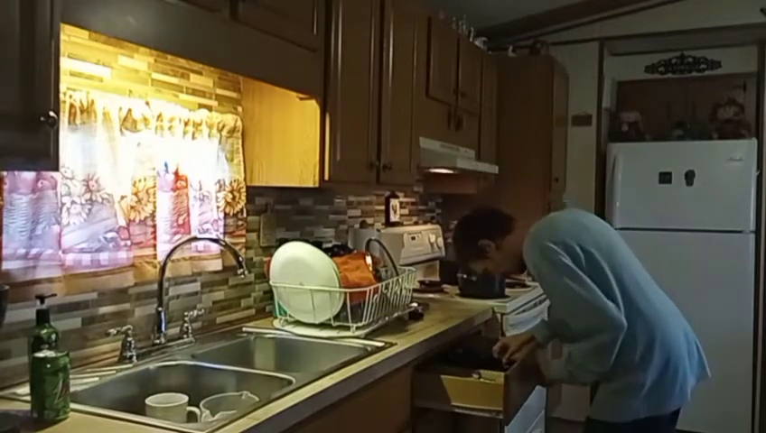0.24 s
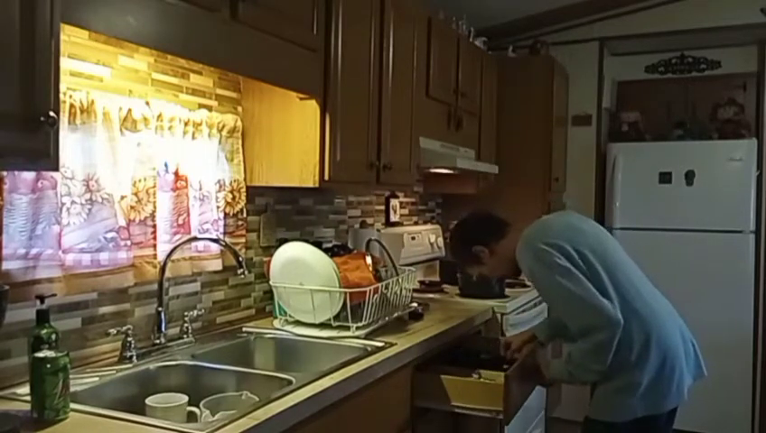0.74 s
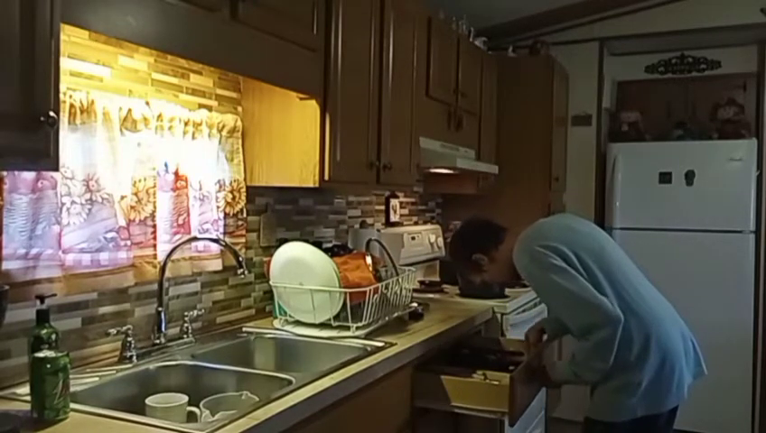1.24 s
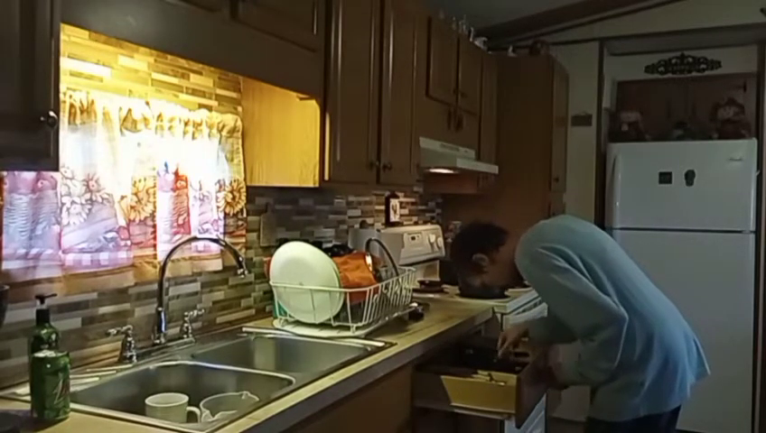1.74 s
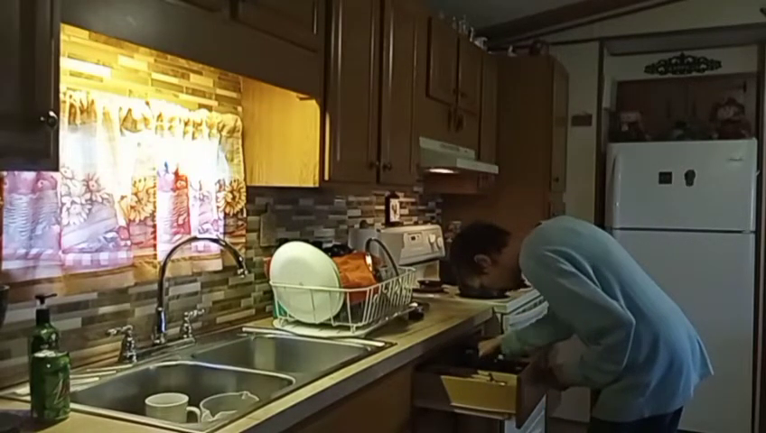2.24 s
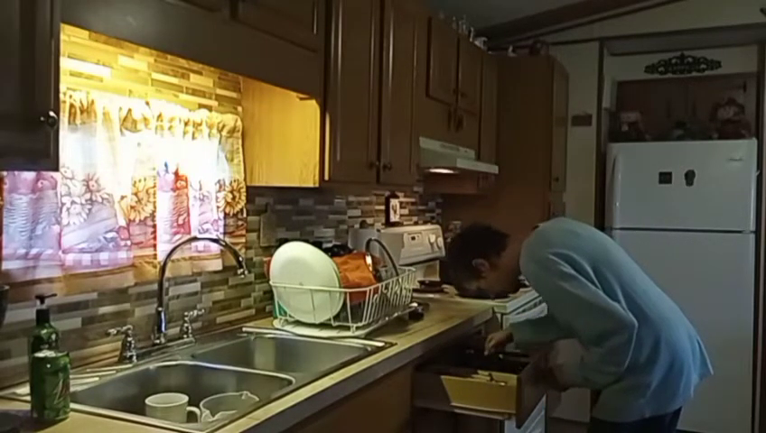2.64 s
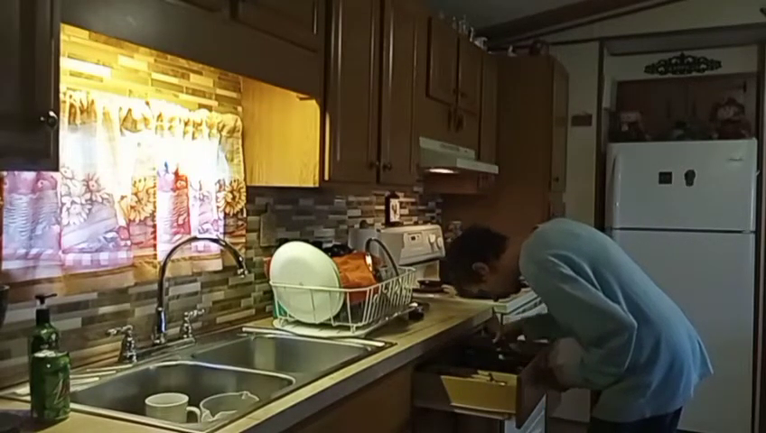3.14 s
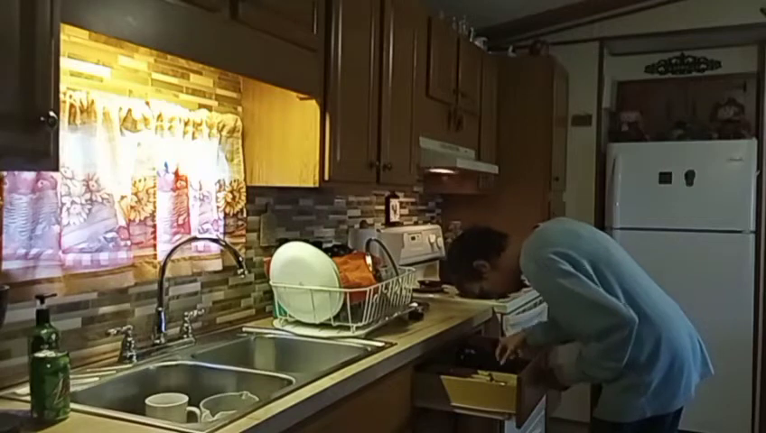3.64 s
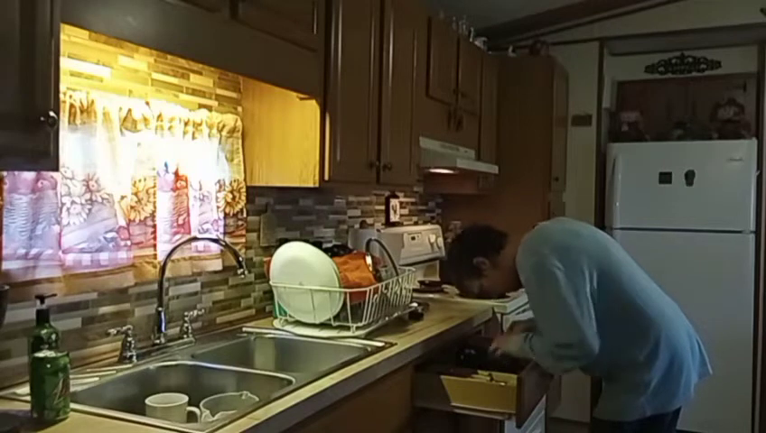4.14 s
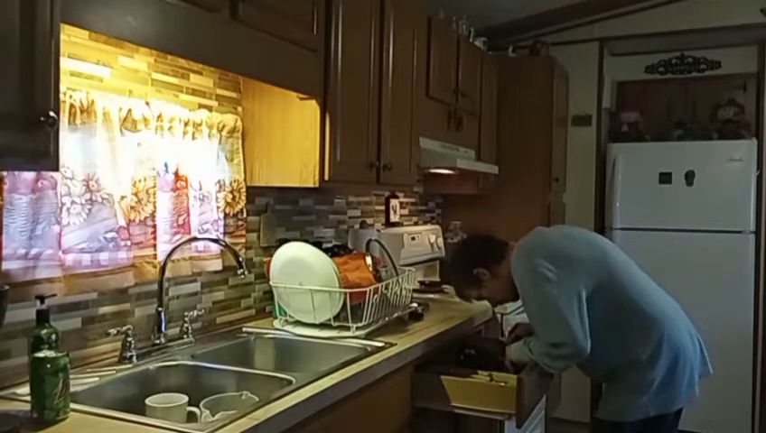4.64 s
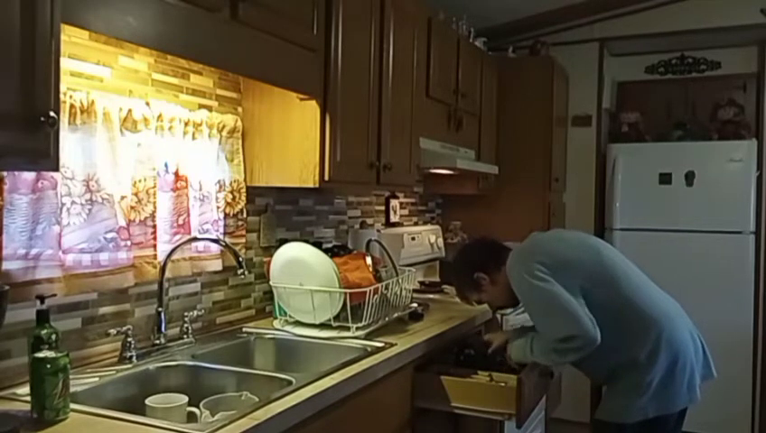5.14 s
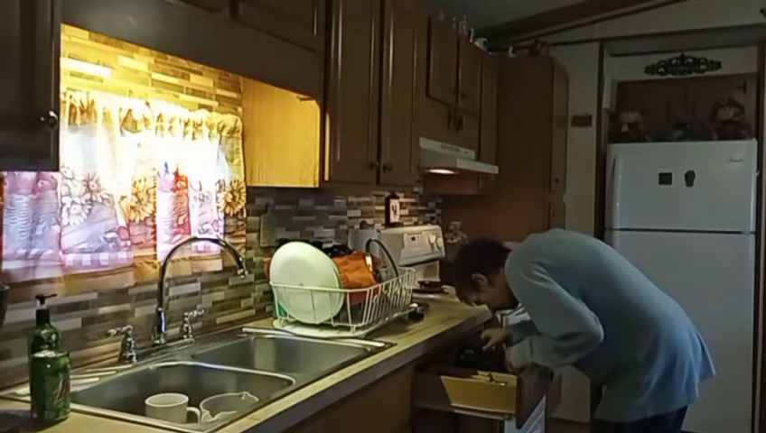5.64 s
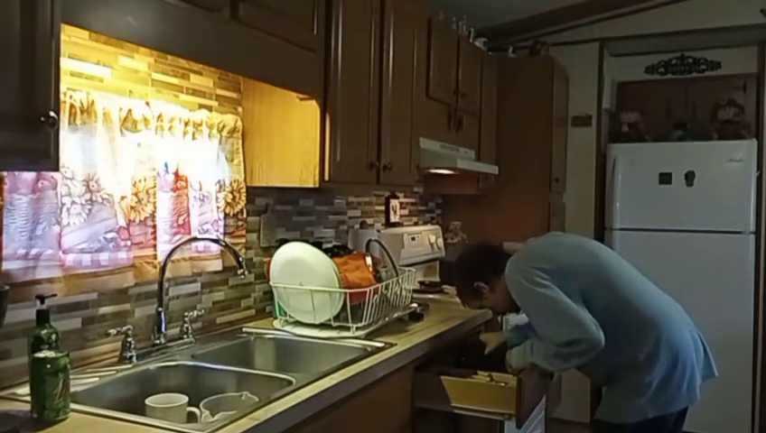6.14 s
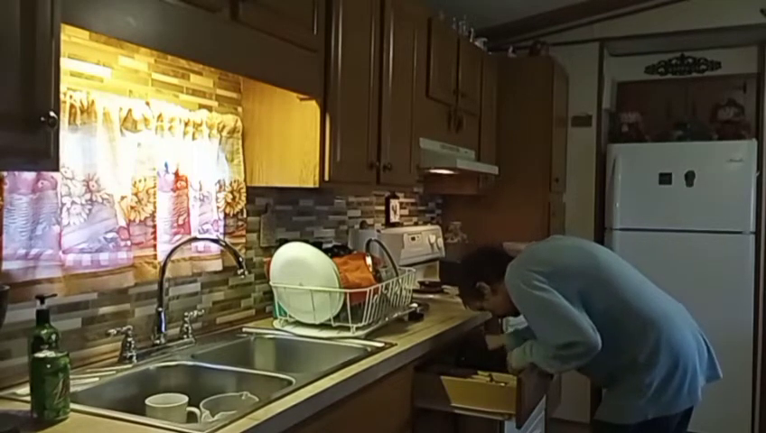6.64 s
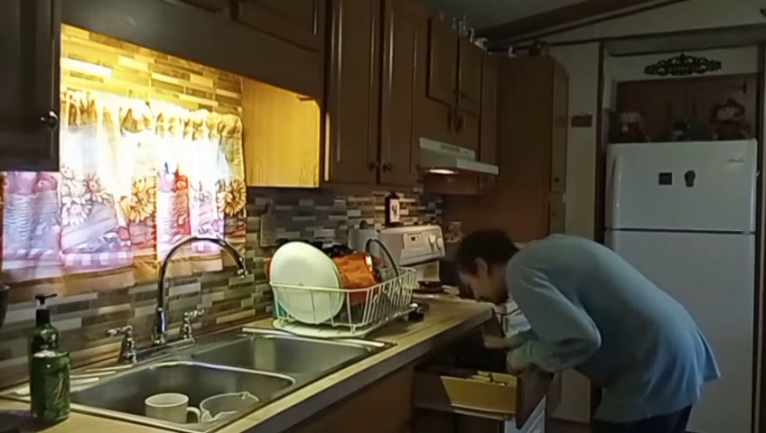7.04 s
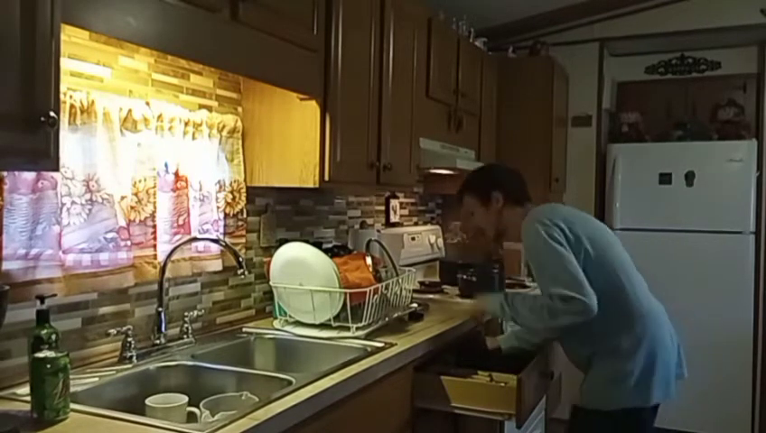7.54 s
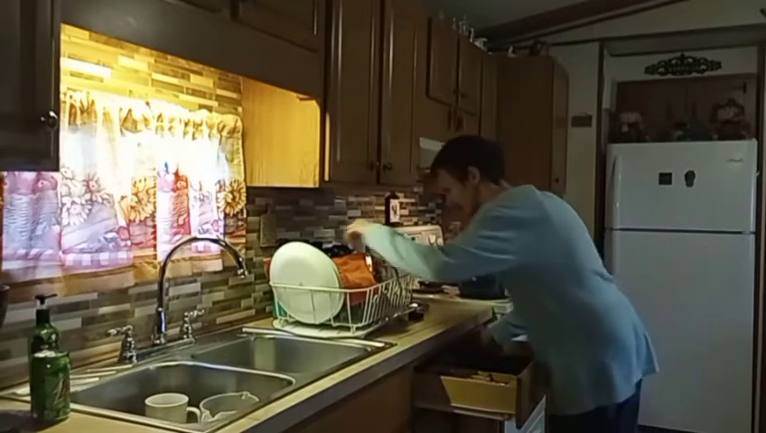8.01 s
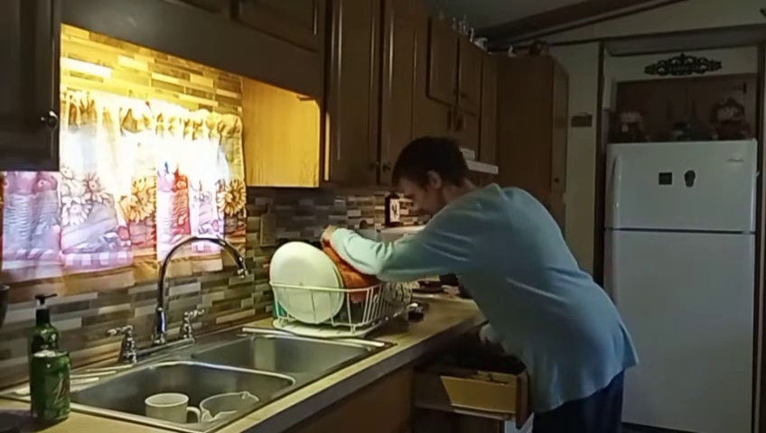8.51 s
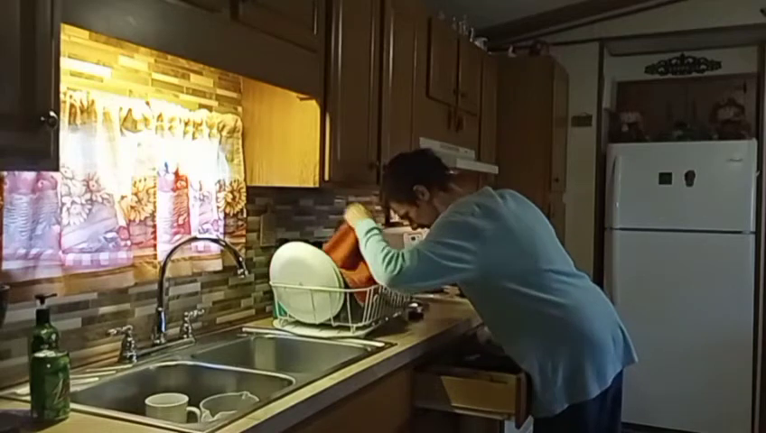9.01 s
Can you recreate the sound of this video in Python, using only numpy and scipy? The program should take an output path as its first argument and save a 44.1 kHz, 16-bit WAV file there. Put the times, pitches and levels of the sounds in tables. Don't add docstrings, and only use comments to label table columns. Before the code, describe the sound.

A small, hard kitchen heard in stereo from about three metres, with echoes stronger than the direct sound and a faint low refrigerator hum and hiss throughout. From 0 to 2 seconds a hand lightly stirs cutlery: soft shuffles, small clinks, wooden taps and tiny squeaks near 1 second. From 2 to 4 seconds the knocks grow firmer, with faint hollow ladle taps around 3 and a sharp clink at 3.4. The busiest rummaging follows, with a bright, hard steel clash at 5.0 and dense clatter from 5.6 to 6.2, over drawer knocks and dull floor thuds. It thins from 6.3, with a brief squeak at 6.6 and scattered light clinks until 8. At 8.4 a dish is nudged, striking loudly at 8.6 and chattering on rack wires. Small knocks near 8.95 precede a ringing pot clang at 9.2.

```python
import sys
import numpy as np
from scipy import signal
from scipy.fft import rfft, irfft
from scipy.io import wavfile
from scipy.ndimage import uniform_filter1d

SR = 44100
rng = np.random.default_rng(int(sys.argv[2]) if len(sys.argv) > 2 else 0)


def inscribe(sig):
    pcm = np.round(np.clip(np.atleast_2d(sig).T, -1, 1) * 32767)
    wavfile.write(sys.argv[1], SR, pcm.astype(np.int16))


def voltage_ratio(level):
    return 10 ** (np.asarray(level, float) / 20)


N = 408807
T = np.arange(N) / SR
BINS = np.maximum(np.fft.rfftfreq(4096, 1 / SR), 1)


def on_log(table, hz):
    f, v = np.transpose(table)
    return np.interp(np.log(hz), np.log(f), v)


def unit(gain):
    return gain(BINS) / np.sqrt(np.mean(gain(BINS) ** 2))


def response(gain):
    cepstrum = irfft(np.log(gain + 1e-5))
    cepstrum[1:2048] = 2 * cepstrum[1:2048]
    cepstrum[2049:] = 0
    return irfft(np.exp(rfft(cepstrum)))


def colour(x, gain):
    return signal.oaconvolve(x, response(unit(gain)))[:N]


def slopes(table, fall_db=24):
    lo, hi = table[0][0], table[-1][0]

    def gain(f):
        octaves_outside = np.abs(np.log2(f / np.clip(f, lo, hi)))
        return voltage_ratio(on_log(table, f) - fall_db * octaves_outside)
    return gain


def ring(hz, t60, size=8192):
    t = np.arange(size) / SR
    z = np.sin(2 * np.pi * hz * t) * 1000. ** (-t / t60)
    return z / np.sqrt(np.sum(z ** 2))


def rattle(ms, chance):
    fade = np.exp(-np.arange(len(chance)) * 1000 / SR / max(ms, .5))
    z = np.r_[3., chance[1:]] ** 3 * fade
    return z / np.sqrt(np.sum(z ** 2))


def add(track, s, x):
    i = int((s - .001) * SR)
    track[i:i + len(x)] += x[:N - i]


# f/Hz, left-right correlation [-]
LIKENESS = [(30, 0.8), (100, 0.88), (200, 0.97), (500, 0.6), (1000, 0.06), (4000, 0.12), (12000, 0.1)]


def pair(size):
    c = np.clip(on_log(LIKENESS, np.maximum(np.fft.rfftfreq(size, 1 / SR), 1)), 0, 1)
    mid, side = rfft(rng.standard_normal((2, size)))
    return irfft(mid * np.sqrt((1 + c) / 2) + side * np.sqrt((1 - c) / 2) * np.array([[1], [-1]]), size)


# f/Hz, level/dB
COMPRESSOR_LINES = [(193.8, -70.5), (387.6, -79.5), (608.3, -100.5), (651.4, -81.5)]
# f/Hz, density/dB per Hz
HISS = [(15, -65), (25, -32), (43, -22.5), (141, -17), (195, -10), (249, -17), (659, -15.5), (936, -23),
        (4610, -34.5), (6380, -35.5), (8360, -46.5), (14800, -43), (16000, -55.5)]


def fridge(waver_db=1.5, hiss_db=-67):
    slow = rng.standard_normal((len(COMPRESSOR_LINES), N))
    slow = uniform_filter1d(uniform_filter1d(slow, 3000), 3000)
    slow = slow / slow.std()
    hum = np.zeros(N)
    for (hz, db), w in zip(COMPRESSOR_LINES, slow):
        hum += np.sqrt(2) * voltage_ratio(db + waver_db * w) * np.sin(2 * np.pi * hz * T + .5 * w)
    f = np.maximum(np.fft.rfftfreq(N, 1 / SR), 1)
    hiss = irfft(rfft(pair(size=N)) * voltage_ratio(on_log(HISS, f)), N)
    return hum + voltage_ratio(hiss_db) * hiss / hiss.std()


# f/Hz, width/Hz, level/dB
DRAWER = [(280, 43, -1), (412.3, 61, 3), (490, 130, -2.5), (593, 52, -2.5), (734, 75, 0.5)]


def wood(f):
    power = sum(voltage_ratio(2 * db) / (1 + (2 * (f - hz) / w) ** 2) for hz, w, db in DRAWER)
    return np.sqrt(power) * slopes([(240, 0), (850, 0)], 14)(f)


# f/Hz, level/dB
SHUFFLE_STEEL = [(1000, -2), (1700, 3), (2700, -2), (3600, -6.5), (5000, -6.5), (6500, -9), (8000, -33.5)]
# f/Hz, level/dB
SPARKLE = [(7000, 0.5), (8000, -5.5), (9000, -5.5), (11000, -3.5), (13000, -9), (14600, 1), (15800, -8)]
# start t/s, hold/s, wood level/dB, steel level/dB
STIRS = [(-.03, 0.019, -47.5, -53.5), (0.088, 0.24, -58, -69), (0.651, 0.22, -58.5, -64),
         (0.967, 0.18, -67, -66.5), (2.27, 0.29, -66, -60.5), (2.482, 0.21, -45, -54),
         (3.468, 0.043, -47.5, -43.5), (3.535, 0.14, -54, -87), (3.775, 0.14, -45, -52.5),
         (3.886, 0.086, -53, -51.5), (4.224, 0.089, -55, -68), (4.447, 0.039, -44.5, -56.5),
         (4.767, .12, -59, -61.5), (5.04, 0.032, -40.5, -44), (5.23, 0.096, -90, -54.5),
         (5.321, 0.064, -46, -51.5), (5.64, 0.046, -34.5, -69), (5.83, 0.053, -69, -58),
         (5.931, 0.012, -42, -66), (6.162, 0.019, -43.5, -82.5), (6.353, 0.72, -63, -74.5),
         (6.914, 0.02, -47, -54.5), (7.414, 0.014, -61, -59.5), (7.78, 0.047, -58.5, -67.5),
         (7.133, 0.085, -63, -68), (4.659, 0.12, -57.5, -63.5), (9.118, 0.018, -78, -65.5),
         (1.95, 0.078, -51.5, -67), (2.02, 0.054, -53.5, -59), (2.883, 0.021, -66, -74),
         (0.323, 0.019, -68, -78.5), (6.11, 0.036, -68, -55), (8.967, 0.028, -52.5, -64)]


def shuffle(per_s=450, send_db=-28, sparkle_db=-22, rise_db_per_s=247.5, fall_db_per_s=174.5):
    ticks = (rng.random(N) < per_s / SR) * voltage_ratio(4 * np.minimum(rng.exponential(size=N), 3))
    ticks = ticks * rng.choice([-1, 1], N)
    ticks = voltage_ratio(send_db) * ticks / ticks.std()
    t = T[::64]
    shape = []
    for s, hold, *_ in STIRS:
        rise_db = np.minimum(rise_db_per_s * (t - s), 0)
        fall_db = np.maximum(fall_db_per_s * (t - s - hold), 0)
        shape.append(voltage_ratio(rise_db - fall_db))
    power = np.array(shape) ** 2
    wood_db, steel_db = np.transpose(STIRS)[2:]
    woody = ticks * np.interp(T, t, np.sqrt(voltage_ratio(2 * wood_db) @ power))
    steely = ticks * np.interp(T, t, np.sqrt(voltage_ratio(2 * steel_db) @ power))
    sparkle = voltage_ratio(sparkle_db) * colour(steely, slopes(SPARKLE, 36))
    return colour(woody, wood) + colour(steely, slopes(SHUFFLE_STEEL)) + sparkle


# f/Hz, level/dB
STEEL = [(1400, -3.5), (1800, 5), (2700, 2.5), (3300, 0.5)]
# f/Hz, level/dB
EDGE = [(3500, -1), (4200, -0.5), (5000, 2), (6500, -3), (7600, -15.5)]
# t/s, level/dB, strongest ring f/Hz, sparkle level/dB, body level/dB
SHARP = [(0.2448, -51, 2150, -14, -21), (1.028, -50, 5700, -2.5, -25), (1.039, -57, 2000, -11, -18),
         (1.075, -45.5, 4960, -4.5, -12), (1.3059, -49, 2050, -7.5, 4), (1.3989, -46.5, 6040, -4.5, 5),
         (1.877, -57.5, 1860, -24, -5), (2.4728, -41.5, 2440, -4.5, 11), (2.5697, -34.5, 1930, -3, 7),
         (2.9122, -56, 5900, -24, 6), (3.415, -32, 1660, -4, -1.5), (3.73, -54, 1650, -10, -7),
         (3.7618, -40.5, 3430, -5.5, 5.5), (4.4273, -47.5, 1630, -6, 7.5), (5.008, -17, 4440, -5, -11.5),
         (5.2478, -34.5, 1620, -7.5, -6), (6.8094, -51.5, 5600, -2, -19.5), (7.0143, -41.5, 5300, -7.5, -2),
         (7.3698, -52, 4694, -0.5, -7.5), (7.429, -40, 4300, -4, -26), (7.6186, -51.5, 2670, -32, -5),
         (7.6809, -43, 2470, -3.5, 1), (7.9389, -53, 4570, -39, -14), (8.562, -50.5, 1610, 1.5, 10),
         (5.6725, -31, 6170, 2, 3), (5.018, -37.5, 3870, 9, -4), (5.0345, -38, 3000, 7, -0.5),
         (5.052, -26.5, 5460, -2, -3), (5.08, -36.5, 5660, -37, -1), (9.2195, -42.5, 1860, 16.5, 11),
         (9.238, -34, 4000, 7, -7), (9.254, -34, 3250, 4, -4)]
# t/s,
# level/dB, strongest ring f/Hz, sparkle level/dB, body level/dB
FLAT = [(0.1999, -50.5, 3700, -36, -20), (0.6636, -53, 2300, -6, 5.5), (0.6863, -46, 2580, -22, -25),
        (2.0139, -38.5, 2000, -14.5, -3), (2.252, -47.5, 1860, -15, 8.5), (2.4486, -43, 1700, -12, 0),
        (2.5054, -36, 1490, -38, 2.5), (3.1023, -54, 2350, -9, 8), (3.1837, -52.5, 1460, -29, -19),
        (3.8531, -36, 1690, -45, 2.5), (4.2213, -47.5, 1700, -12.5, -1.5), (4.7235, -31, 2820, -16.5, 1),
        (4.9195, -24.5, 2430, -24, -0.5), (4.9262, -30.5, 2120, -13.5, 3), (5.464, -40, 1890, -35, -3.5),
        (5.596, -27, 4000, -51, -8), (5.6015, -31.5, 1870, -47, -16), (5.6646, -22.5, 1980, -55, -3),
        (5.899, -30.5, 1500, -32, 11), (5.9054, -38.5, 1800, -12, -7), (6.1364, -26, 3570, -16.5, -8.5),
        (6.165, -43.5, 1510, -27, 14.5), (6.9197, -33.5, 1980, -20, 1.5), (7.1383, -52.5, 1820, -32, -6.5),
        (7.8434, -42, 1530, -29, -6), (8.5949, -27.5, 1590, -10, -5), (8.931, -39, 1630, -30, -3),
        (9.2037, -18, 2830, -28, 3)]
# t/s, level/dB, strongest ring f/Hz, sparkle level/dB, body level/dB
DULL = [(0.2645, -48, 2390, -27, 1), (0.3336, -44, 2370, -20, -1.5), (0.5298, -45, 2470, -49, -52),
        (1.926, -41, 1940, -25, 1), (2.6243, -34, 1980, -39, -18), (2.8736, -67, 1930, -64, 14),
        (3.8107, -45, 1650, -35, 7.5), (3.902, -38.5, 2530, -34, 2), (3.9435, -54, 1550, -36, -16),
        (4.035, -40, 1650, -41, -1), (4.2819, -53, 1670, -25, 0), (4.4464, -37.5, 1740, -25, -24),
        (4.4878, -71.5, 1520, -33, 31), (5.4143, -38.5, 1560, -37, -5), (5.574, -47, 3520, -40, 3),
        (5.5836, -51, 2100, -42, 17), (5.8216, -45, 1870, -28, 10.5), (6.062, -40, 3220, -47.5, 4),
        (6.0755, -35.5, 1790, -54, 3.5), (6.5908, -61, 2190, -45.5, 4), (6.8911, -64, 1780, 4, -9),
        (8.966, -28.5, 2320, -19.5, -5.5)]


def clinks(sharpness=5):
    out = np.zeros(N)
    body = slopes([(850, -1.1), (1400, 0.1)])
    gains = (slopes(STEEL, 30), slopes(EDGE, 60), slopes(SPARKLE, 40), body)
    colours = np.array([unit(g) for g in gains])
    # contacts, edge dB, ring dB, chatter ms
    kinds = [(SHARP, 2.9, -1.5, 3.9), (FLAT, -5, -2.5, 3.3), (DULL, -9.5, -0.5, 3.9)]
    for contacts, edge_db, ring_db, rattle_ms in kinds:
        chances = rng.standard_normal((len(contacts), 4096))
        for (s, db, hz, *rest_db), chance in zip(contacts, chances):
            peak = unit(lambda f: 1 / (1 + (sharpness * (f / hz - hz / f)) ** 2))
            power = voltage_ratio(2 * np.r_[0, edge_db, rest_db]) @ colours ** 2 + voltage_ratio(2 * ring_db) * peak ** 2
            blow = signal.oaconvolve(rattle(rattle_ms, chance), response(np.sqrt(power)))
            add(out, s, voltage_ratio(db - 13.0) * blow)
    return out


# t/s, peak level/dB, f/Hz, t60/s
PINGS = [(3.893, -41, 737, .08), (4.036, -48, 785, 0.079), (5.008, -19.5, 4900, 0.028),
         (5.009, -20, 2885, 0.046), (5.008, -22, 5210, .03), (5.008, -29, 3960, .04),
         (4.9195, -36, 620, 0.037), (5.601, -40, 1940, .06), (5.665, -28, 2085, 0.064),
         (5.674, -29, 6260, 0.036), (5.905, -29, 1907, 0.042), (6.0735, -33, 1780, .06),
         (6.077, -33, 2210, 0.041), (6.1365, -33, 3280, .05), (6.593, -53, 1670, 0.081),
         (6.595, -57, 2270, .1), (8.368, -52.5, 920, .2), (8.388, -46.5, 930, 0.081),
         (8.39, -62, 5744, 0.13), (8.66, -40, 880, 0.093), (8.563, -48, 910, 0.16),
         (8.591, -30, 866, 0.077), (8.592, -32, 1636, 0.1), (8.593, -29.5, 2510, 0.084),
         (8.595, -38, 3250, .06), (8.935, -44, 440, 0.088), (8.968, -48, 436, 0.065),
         (9.204, -27, 1110, 0.098), (9.204, -22, 3250, .05), (9.204, -20, 2754, 0.071)]
# t/s, peak level/dB, f/Hz
PANEL_NOTES = [(0.271, -44.5, 432), (0.339, -42.5, 284), (0.689, -44, 753), (0.786, -43.5, 757),
               (0.811, -42, 690), (0.861, -50.5, 731), (1.16, -51, 384), (1.189, -55, 490),
               (1.305, -38, 416), (2.015, -38.5, 424), (2.6, -34, 405), (2.626, -36.5, 278),
               (2.878, -49, 760), (2.895, -45, 280), (2.93, -40.5, 557), (3.104, -46, 424),
               (3.423, -33, 384), (3.437, -36, 422), (3.54, -40.5, 748), (3.889, -43, 288),
               (4.045, -47, 415), (4.285, -46.5, 402), (4.429, -40, 411), (4.655, -43.5, 407),
               (4.835, -43, 410), (5.03, -33.5, 296), (5.475, -41, 398), (5.631, -39, 406),
               (5.765, -36, 429), (5.79, -36.5, 275), (5.92, -37.5, 403), (6.166, -39, 421),
               (6.85, -48.5, 445), (6.936, -41.5, 248), (7.0, -45.5, 612), (7.21, -51.5, 295),
               (7.432, -51, 747), (7.465, -47, 735), (7.68, -46.5, 437), (7.85, -54, 429),
               (7.875, -48, 266), (9.206, -36, 678)]


def pings(rings, attack_ms, lag=5):
    out, t = np.zeros(N), np.arange(8192) / SR
    attack = 1 - np.exp(-t * 1000 / attack_ms)
    for s, db, hz, t60 in rings:
        add(out, s, voltage_ratio(db) * attack * np.sin(2 * np.pi * hz * t) * 1000. ** (-t / t60))
    return np.array([np.roll(out, lag), out])


# t/s, level/dB, strongest ring f/Hz
BOTTOM = [(1.306, -37, 416), (1.345, -37.5, 334), (1.889, -42, 318), (1.932, -38.5, 455),
          (2.031, -29.5, 280), (2.421, -41.5, 327), (2.599, -32.5, 423), (3.426, -29, 395),
          (3.543, -38, 410), (3.589, -44, 423), (3.737, -33, 386), (4.431, -33, 406), (4.652, -44.5, 422),
          (4.832, -46, 435), (4.919, -28.5, 376), (5.011, -21, 397), (5.101, -37, 393), (5.235, -36, 300),
          (5.295, -33, 393), (5.472, -32.5, 417), (5.629, -34, 428), (6.906, -45, 395), (7.147, -47, 344),
          (7.2, -41, 291), (7.852, -42, 435)]
# t/s, level/dB, strongest ring f/Hz
SIDES = [(0.29, -36, 448), (1.08, -41.5, 480), (2.256, -41, 517), (2.474, -32, 426), (2.719, -46, 490),
         (2.908, -39, 546), (3.104, -36.5, 468), (3.196, -40, 476), (3.806, -57, 477), (5.595, -30.5, 493),
         (5.761, -31, 453), (6.073, -48, 540), (6.134, -32, 463), (7.351, -45.5, 507), (7.683, -48.5, 458),
         (8.935, -31.5, 447), (8.969, -38, 483), (9.137, -45.5, 460), (5.034, -40, 508), (9.21, -34, 549),
         (3.44, -31.5, 338), (6.93, -39, 280)]
# t/s, level/dB, strongest ring f/Hz
DIVIDERS = [(0.334, -34, 754), (0.539, -40, 708), (0.658, -46.5, 760), (0.688, -42, 690), (0.765, -42, 794),
            (1.399, -37.5, 700), (2.302, -39, 703), (2.377, -43, 614), (2.564, -34, 734), (2.878, -44, 767),
            (3.849, -49, 690), (3.888, -36.5, 752), (4.037, -33.5, 724), (4.73, -38.5, 570),
            (5.4, -36, 726), (5.897, -29, 634), (7.431, -47, 754), (9.204, -36.5, 617), (4.924, -27, 662),
            (5.018, -31, 660)]


def knocks(ring_db=-2, thud_db=-23, t60=0.067, contact_ms=7, lead_s=0.00401):
    panels, rings = np.zeros((2, N))
    hits = BOTTOM + SIDES + DIVIDERS
    for (s, db, hz), chance in zip(hits, rng.standard_normal((len(hits), 2048))):
        blow = rattle(contact_ms, chance) * voltage_ratio(db - 12)
        add(panels, s - lead_s, blow)
        add(rings, s - lead_s, voltage_ratio(ring_db) * signal.oaconvolve(blow, ring(hz, t60)))
    cupboard = colour(panels, slopes([(60, -36.5), (145, -8.0), (200, -16.5)], 70))
    return colour(panels, wood) + voltage_ratio(thud_db) * cupboard + rings


# t/s, length/s, from f/Hz, to f/Hz, level/dB
SQUEAKS = [
    (0.956, .08, 2050, 1900, -77),
    (1.144, 0.031, 3080, 3060, -76),
    (1.2, 0.072, 3060, 3050, -84),
    (1.265, 0.032, 1750, 1900, -78),
    (1.269, .03, 1450, 1500, -81),
    (1.815, 0.073, 4750, 4900, -87),
    (7.295, 0.055, 5600, 5500, -84),
    (6.59, .04, 2100, 2000, -74),
    (6.587, 0.043, 1530, 1250, -73),
]


def squeaks(wobble=.025, rough_db=5):
    out = np.zeros(N)
    chances = rng.standard_normal((len(SQUEAKS), 2, 8192))
    for (s, length, from_hz, to_hz, db), chance in zip(SQUEAKS, chances):
        n = int(length * SR)
        slow = 12 * uniform_filter1d(chance, 150)[:, :n]
        hz = np.linspace(from_hz, to_hz, n) * (1 + wobble * slow[0])
        phase = 2 * np.pi * np.cumsum(hz) / SR
        add(out, s, voltage_ratio(db - 16.5 + rough_db * slow[1]) * np.sqrt(np.hanning(n)) * np.sin(phase))
    return out


# t/s, level/dB, f/Hz
THUDS = [(2.567, -46.5, 169.5), (3.199, -60.5, 141), (3.748, -49, 143.5), (3.848, -56, 150),
         (5.022, -49, 149.6), (5.921, -55, 143), (6.271, -54.5, 141), (6.326, -51, 155.6),
         (9.209, -49, 164), (2.35, -65.5, 110), (2.741, -61, 127.5), (5.449, -55.5, 151), (5.69, -54, 148),
         (6.16, -58, 135), (6.931, -53, 194), (8.6, -51.5, 183)]


def thuds(t60=0.27):
    out = np.zeros(N)
    push = np.hanning(300) / 100
    for s, db, hz in THUDS:
        add(out, s, voltage_ratio(db + 8.0) * signal.oaconvolve(ring(hz, t60), push))
    return out


# f/Hz, level/dB
LADLE = [(1450, -12), (1850, -6), (2300, -18), (3750, -22)]
# t/s, level/dB
LADLE_TAPS = [
    (2.882, -56),
    (2.917, -57.5),
    (3.186, -61),
    (3.241, -66),
    (3.308, -56),
    (3.334, -57),
]


def ladle(t60=0.03):
    out = np.zeros(N)
    tone = sum(voltage_ratio(db) * ring(hz, t60) for hz, db in LADLE)
    for s, db in LADLE_TAPS:
        add(out, s, voltage_ratio(db) * tone)
    return out


# f/Hz, level/dB, t60/s
DISH = [(852, 7.5, 0.077), (920, 6, 0.066), (1620, -0.5, 0.055), (2580, -2, 0.026), (3250, -3.5, 0.05),
        (4090, -1, 0.048)]
# f/Hz, level/dB, t60/s
WIRES = [(7600, -10.5, 0.019), (10700, -28, 0.058), (11500, -5.5, 0.076), (12500, -5, .05),
         (14400, 4, 0.046), (15100, -6, .05)]
# t/s, level/dB, chatter/ms, chatter level/dB
DISH_HITS = [
    (8.387, -49.5, 25, -8),
    (8.5936, -33.5, 38, 10.5),
    (8.658, -41, 24, 5),
    (8.697, -47.5, 26, 15),
    (8.746, -58, 17, 14.5),
    (8.794, -65, 7.7, 7),
]


def dish(dulling=0.17, loudest_db=-32, lowest_hz=830):
    out, wires = np.zeros((2, N))
    chances = rng.standard_normal((len(DISH_HITS), 16384))
    for (s, db, ms, chatter_db), chance in zip(DISH_HITS, chances):
        dull_db = dulling * (db - loudest_db)
        tone = sum(voltage_ratio(g + dull_db * np.log2(hz / lowest_hz)) * ring(hz, t60) for hz, g, t60 in DISH)
        add(out, s, voltage_ratio(db - 11.5) * tone)
        add(wires, s, voltage_ratio(db + chatter_db - 10.5) * rattle(ms, chance))
    out = signal.sosfilt(signal.butter(2, 650, "high", fs=SR, output="sos"), out)
    wire_ring = sum(voltage_ratio(g) * ring(hz, t60) for hz, g, t60 in WIRES)
    out = out + voltage_ratio(-11) * signal.oaconvolve(wires, wire_ring)[:N]
    chatter = slopes([(900, 1.0), (3000, -8.5), (8000, -10.5), (13000, -17), (15500, -2.5)], 28.4)
    return out + colour(wires, chatter)


# f/Hz, level/dB, t60/s
POT = [(549, -7, 0.42), (1110, -8, 0.24), (1134, -19, 0.071), (1190, -24, 0.072), (1680, 1, 0.035),
       (1930, -6, .06), (2680, 0, 0.24), (3180, 0, 0.091), (3430, -1.5, 0.022), (3983, -2.5, 0.1),
       (5460, -27, 0.11), (12200, -10.5, .2), (14390, -10, .2), (14650, -14.5, .2)]


def pot(s=9.204, level_db=-33.5):
    out = np.zeros(N)
    add(out, s, voltage_ratio(level_db - 1.0) * sum(voltage_ratio(db) * ring(hz, t60) for hz, db, t60 in POT))
    return out


# f/Hz, t60/s
ROOM = [(125, 0.17), (400, 0.44), (1000, 0.35), (3000, 0.42), (8000, 0.31), (15000, 0.2)]


def kitchen(x, scale, direct_db, build_ms):
    t = np.arange(16384) / SR
    spec = rfft(pair(size=len(t)))
    f = np.maximum(np.fft.rfftfreq(len(t), 1 / SR), 1)
    tail = 0
    for hz in 62.5 * 2. ** np.arange(9):
        share = np.clip(1 - np.abs(np.log2(f / hz)), 0, 1)
        tail = tail + irfft(spec * share, len(t)) * 1000. ** (-t / (scale * on_log(ROOM, hz)))
    tail = tail * (1 - np.exp(-t * 1000 / build_ms))
    tail[[0, 1], [4, 0]] = voltage_ratio(direct_db)
    return signal.oaconvolve(x[None], tail, axes=1)[:, :N]


def places(x, count, hold_ms=70, **room):
    hold = int(hold_ms * SR / 1000)
    where = np.repeat(rng.integers(0, count, N // 1000), hold)[:N]
    return sum(kitchen(x * uniform_filter1d(1. * (where == i), 200), **room) for i in range(count))


# t/s, left minus right level/dB
SIDEWAYS = [
    (0, 0.3),
    (6, -1.2),
    (6.7, -2),
    (7.7, -6.5),
    (8.6, -1.7),
    (9.27, -0.7),
]


def scene():
    struck = clinks() + knocks() + squeaks() + thuds() + ladle() + dish() + pot()
    hands = places(struck, count=4, scale=0.87, direct_db=15.0, build_ms=0.75)
    hands = hands + places(shuffle(), count=2, scale=0.41, direct_db=17.0, build_ms=0.95)
    panel_t60_s = 0.08
    panel_rings = [(*note, panel_t60_s) for note in PANEL_NOTES]
    hands = hands + pings(PINGS, attack_ms=1.5) + voltage_ratio(5.5) * pings(panel_rings, attack_ms=8.9)
    pan_db = np.interp(T, *np.transpose(SIDEWAYS))
    return hands * voltage_ratio(np.array([pan_db, -pan_db]) / 2) + fridge()


def quieten(band, knee_db, depth_db, slope=0.96):
    loud_db = 10 * np.log10(uniform_filter1d(np.mean(band ** 2, 0), 700) + 1e-12)
    return band * voltage_ratio(np.clip(slope * (loud_db - knee_db), -depth_db, 0))


def top_cut(x):
    return signal.sosfilt(signal.butter(12, 16780, fs=SR, output="sos"), x)


def record(dry):
    dry = signal.sosfilt(signal.butter(2, 60, "high", fs=SR, output="sos"), dry)
    dry = signal.sosfilt(signal.ellip(8, .2, 60, 15700, fs=SR, output="sos"), dry)
    bass, low, mid = (signal.sosfiltfilt(signal.butter(2, hz, fs=SR, output="sos"), dry)
                      for hz in (240, 900, 7000))
    mix = bass + quieten(low - bass, -59.0, 6.5)
    mix = mix + quieten(mid - low, -59.5, 14, 0.37)
    mix = mix + quieten(dry - mid, -74.5, 13, 0.42)
    return top_cut(mix)


dry = scene()
out = record(dry)
inscribe(out)
```